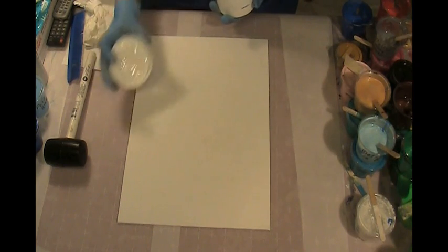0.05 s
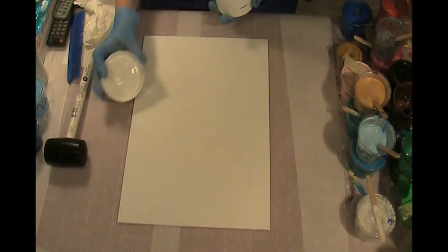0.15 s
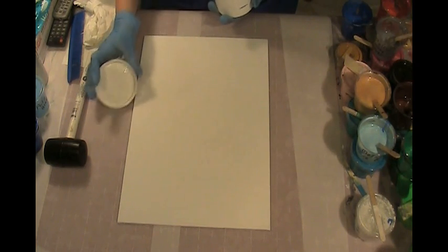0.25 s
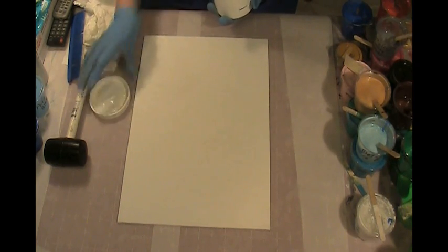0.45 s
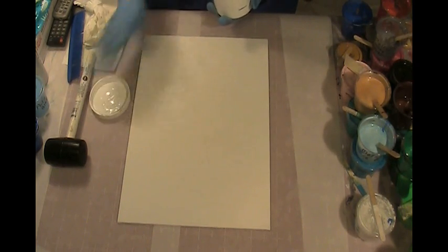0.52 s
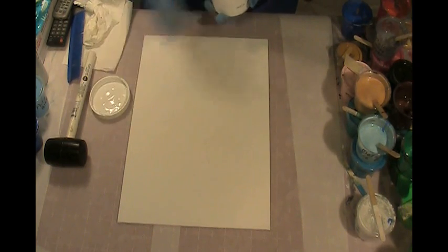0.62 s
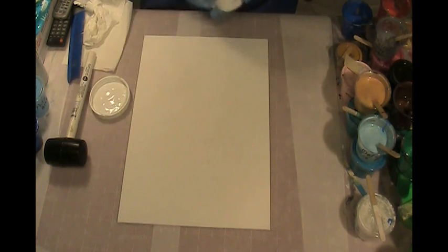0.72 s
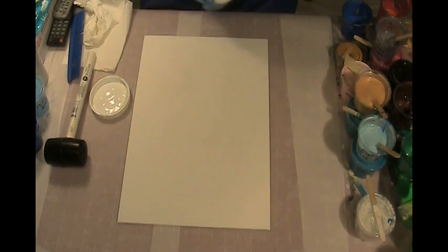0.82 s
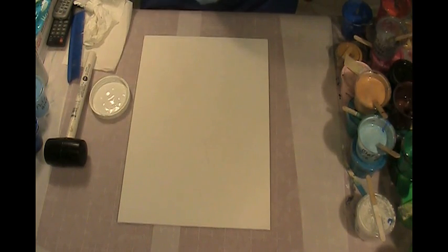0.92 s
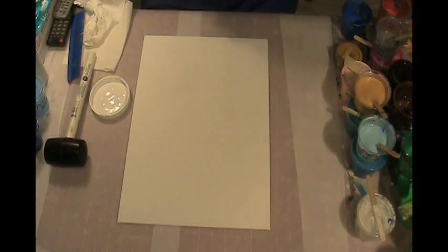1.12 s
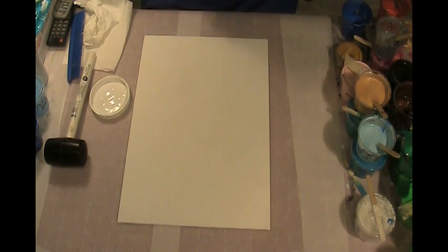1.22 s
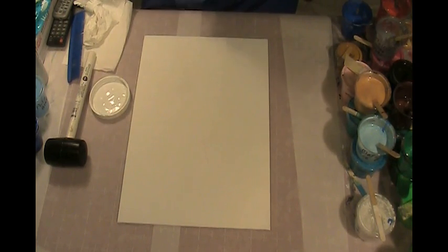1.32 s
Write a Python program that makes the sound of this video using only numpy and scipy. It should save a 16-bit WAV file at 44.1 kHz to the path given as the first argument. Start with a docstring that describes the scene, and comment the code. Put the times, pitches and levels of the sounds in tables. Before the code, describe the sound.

A plastic lid is set down on a table with a knock and a sharp clack.

```python
"""A plastic lid is set down on a covered table in a small room by a gloved hand.
One edge knocks first and slides on the cloth, then the lid drops flat with a sharp clack.
Each landing rings the lid and the table, and the rim chatters in a few quick clicks.
The glove rustles as the hand draws back; faint plastic taps and quiet room noise lie underneath."""
import sys
import numpy as np
from scipy import signal
from scipy.fft import rfft, irfft
from scipy.io import wavfile
from scipy.ndimage import uniform_filter1d

SR = 44100
rng = np.random.default_rng(int(sys.argv[2]) if len(sys.argv) > 2 else 0)


def store_wav(level_fs):
    """Save 16-bit WAV to argv[1]."""
    pcm = np.round(np.clip(np.atleast_2d(level_fs), -1, 1) * 32767)
    wavfile.write(sys.argv[1], SR, pcm.T.astype(np.int16))


N = 59535
TIME = np.arange(N) / SR

# the lid lands on its edge, then flat: start_s, level_db, splash_db, splash_brightness_hz
LANDINGS = [(0.218, -3, 4.5, 1920), (0.38967, -1.5, 7.5, 3700)]


def from_db(db):
    """Decibels to gain."""
    return 10 ** (np.asarray(db) / 20)


def unit_rms(x):
    """Scale to an rms of 1."""
    return x / np.sqrt(np.mean(x ** 2) + 1e-20)


def at_hz(curve, hz):
    """Read a curve on a log-frequency axis."""
    freqs, values = np.transpose(curve)
    return np.interp(np.log(hz), np.log(freqs), values)


def decay(start_s, t60_s):
    """Envelope that jumps to 1 and loses 60 dB in t60_s."""
    return (TIME >= start_s) * np.exp(-np.log(1000) * np.maximum(TIME - start_s, 0) / t60_s)


def ring(start_s, hz, t60_s):
    """A struck mode: a decaying sine."""
    return decay(start_s, t60_s) * np.sin(2 * np.pi * hz * (TIME - start_s))


def butter(x, hz, kind, order=2):
    """Causal Butterworth filter."""
    sos = signal.butter(order, np.clip(hz, 10, .45 * SR), kind, fs=SR, output="sos")
    return signal.sosfilt(sos, x + 1e-18)


def widen(mid, side, side_db):
    """Left and right from mid and side."""
    return mid + from_db(side_db) * side * np.array([[1], [-1]])


def stereo_noise(colour, width):
    """Steady noise of rms 1, shaped by a colour curve and a width curve."""
    hz = np.maximum(np.arange(N // 2 + 1) * SR / N, 1)
    mid, side = rfft(rng.standard_normal((2, N)))
    spectrum = widen(mid, side, at_hz(width, hz)) * from_db(at_hz(colour, hz))
    return unit_rms(irfft(spectrum, N))


def room_noise():
    """A steady wide hiss with the drone of a low resonance."""
    # tone of the hiss: freq_hz, relative_db
    colour = [(15, -45), (25, -25), (175, -8.5), (256, -3.5), (335, -3), (439, -3.5), (641, -8), (911, -7),
              (988, -16), (1070, -10), (1740, -19), (2110, -19), (7310, -29.5), (13600, -38.5),
              (16000, -42)]
    # stereo width of the hiss: freq_hz, side_over_mid_db
    width = [(30, -4), (100, 10.5), (250, -0.5), (700, -2), (2000, 2.5), (12000, 1.5)]
    resonance = ring(0, hz=245, t60_s=0.085)
    drone = signal.fftconvolve(rng.standard_normal(2 * N), resonance)[N:2 * N]
    return from_db(-52.5) * stereo_noise(colour, width) + from_db(-63.5) * unit_rms(drone)


def plastic_taps():
    """Light touches on the plastic, each a brief, blurred ring of narrow-band noise."""
    # faint taps: start_s, level_db, pitch_hz
    touches = [(0.082, -59, 2040), (0.777, -57.5, 2060), (1.116, -67, 3060), (1.2, -64, 3050),
               (1.264, -62, 1900), (1.311, -62, 2130)]
    band_ratio = 1.06
    out = np.zeros(N)
    for start_s, level_db, pitch_hz in touches:
        band = butter(rng.standard_normal(N), [pitch_hz / band_ratio, pitch_hz * band_ratio], "band")
        out += from_db(level_db) * decay(start_s, t60_s=0.14) * unit_rms(band)
    return out


def edge_slide():
    """The edge of the tilted lid hisses over the cloth between the two landings."""
    # swell and fade of the slide: time_s, level_db
    swell = [(.215, -53), (.228, -45.5), (.27, -44.5), (.32, -50), (.375, -52.5), (.395, -55)]
    # tone of plastic on cloth: freq_hz, relative_db
    colour = [(500, 4), (1000, 14), (2000, 2), (4500, -5), (6500, -5), (8200, -6), (10000, -17.5),
              (15000, -25)]
    level_db = np.interp(TIME, *np.transpose(swell), left=-120, right=-120)
    return from_db(level_db) * stereo_noise(colour, width=[(1000, -11.5)])


def lid_knocks():
    """Each landing rings the lid and the table; where it strikes sets the strength of each mode."""
    # modes of the lid: pitch_hz, t60_s, edge_hit_db, flat_hit_db
    lid_modes = [(642.5, 0.068, -24, -14), (831.6, 0.036, -20.5, -15), (1055.5, .028, -24, -12),
                 (1210, 0.032, -28, -21.5), (1412, 0.04, -23.5, -35), (1514, 0.025, -16.5, -29),
                 (1830, 0.043, -33, -13), (2044, 0.015, -26.5, -28), (2220, 0.013, -39, -13),
                 (2830, 0.035, -44, -31), (3237, 0.03, -46, -18.5), (3478, 0.019, -55, -14.5),
                 (4230, 0.0097, -28.5, -15.5), (6080, 0.013, -49, -27)]
    # modes of the table under it: pitch_hz, t60_s, edge_hit_db, flat_hit_db
    table_modes = [(91, 0.19, -53, -47), (141.8, 0.22, -39.5, -38), (226.7, 0.45, -54, -44.5),
                   (413.5, 0.25, -35, -33.5), (622, 0.073, -33.5, -29), (673.5, .16, -30, -28),
                   (881, 0.27, -32.5, -36.5)]
    out = np.zeros(N)
    for landing, (start_s, level_db, *_) in enumerate(LANDINGS):
        for pitch_hz, t60_s, *hit_db in lid_modes + table_modes:
            delay_s = 0.002031 * min(1000 / pitch_hz, 2)   # bending waves are slow in the bass
            out += from_db(level_db + hit_db[landing]) * ring(start_s + delay_s, pitch_hz, t60_s)
    return butter(out, 134, "high")   # a small lid radiates little bass


def landing_splash():
    """The broad pulse that each landing throws sideways, heard only by way of the walls."""
    out = np.zeros(N)
    for start_s, _, splash_db, brightness_hz in LANDINGS:
        pulse = butter(decay(start_s, t60_s=0.00098), brightness_hz, "low")
        out += from_db(splash_db) * unit_rms(pulse)
    return butter(out / np.sqrt(N), 408, "high")


def rim_chatter():
    """Each contact of the rim is a crack, a heavily damped snap, a scrunch and a trace of grit."""
    # the rim hits the table: start_s, level_db, brightness_hz
    contacts = [(0.2187, -3.5, 1570), (0.2221, -8, 1500), (0.2239, -13.5, 1030), (0.387, -8.5, 4300),
                (0.3893, -6.5, 4200), (0.39, 6, 4700), (0.39129, -2.5, 3120), (0.3945, -7.5, 5600),
                (0.3976, -4, 1990)]
    out = np.zeros(N)
    for start_s, level_db, brightness_hz in contacts:
        crack = from_db(-3) * unit_rms(ring(start_s, brightness_hz, t60_s=0.00055))
        snap = unit_rms(ring(start_s, hz=2157, t60_s=0.0047))
        scrunch_envelope = from_db(-3) * unit_rms(decay(start_s, t60_s=0.0034))
        grit_envelope = from_db(-7.5) * unit_rms(decay(start_s, t60_s=0.048))
        rasp = butter((scrunch_envelope + grit_envelope) * rng.standard_normal(N), 3520, "high")
        rasp = butter(rasp, 3 * brightness_hz, "low")
        out += from_db(level_db) * butter(snap + crack + rasp, brightness_hz, "low", order=1)
    return butter(out / np.sqrt(N), 670, "high")


def even_noise(envelope):
    """Two mid/side noise pairs, flattened so that no narrow band stands out under the envelope."""
    noise = rng.standard_normal((2, 2, N))
    for _ in range(2):
        power = uniform_filter1d(np.abs(rfft(noise * envelope)) ** 2, size=45, axis=-1)
        noise = unit_rms(irfft(rfft(noise) / np.sqrt(power), N))
    return noise


def room_reverb(sound):
    """Diffuse reflections build up quickly and die band by band, wider in the treble."""
    # tone of the reflections: freq_hz, level_db
    colour = [(100, -2.5), (300, -3.5), (700, -4), (1100, -6), (2000, -4), (3500, -5), (7000, -5),
              (14000, -8)]
    # decay of the room: freq_hz, t60_s
    decay_times = [(100, 0.28), (700, 0.24), (1400, 0.27), (2500, 0.22), (5000, 0.22), (14000, 0.16)]
    # stereo width of the reflections: freq_hz, side_over_mid_db
    width = [(100, -27), (700, -15.5), (1800, -8), (3500, -5), (7000, -3), (12000, 3)]
    predelay_s, build_s = 0.0023, 0.009
    build = np.clip((TIME - predelay_s) / build_s, 0, 1)
    noise = even_noise(build * decay(0, t60_s=0.3))
    edges_hz = np.geomspace(60, 17000, 17)
    response = np.zeros((2, N))
    for k, band in enumerate(zip(edges_hz, edges_hz[1:])):
        hz = np.sqrt(band[0] * band[1])
        tail = unit_rms(build * decay(0, at_hz(decay_times, hz))) / np.sqrt(N)
        mid, side = butter(noise[k % 2], band, "band")
        response += from_db(at_hz(colour, hz)) * tail * widen(mid, side, at_hz(width, hz))
    return signal.fftconvolve(response, sound[None], axes=1)[:, :N]


def glove_rustle():
    """Grainy friction of glove and sleeve that follows the hand as it draws back."""
    # the rustle rises and falls with the hand: time_s, level_db
    gesture = [(0, -89), (.55, -62.5), (.69, -80), (.74, -56.5), (.765, -61.5), (.783, -57.5), (.81, -61.5),
               (.86, -63.5), (.915, -61), (.96, -62.5), (1.02, -72), (1.1, -70.5), (1.118, -56),
               (1.15, -70), (1.205, -60.5), (1.228, -70), (1.27, -63.5), (1.35, -64)]
    # tone of the rustle: freq_hz, relative_db
    colour = [(300, -16), (1000, -1), (2000, 1.5), (3200, 2.5), (5000, -3.5), (7000, -3), (10000, -15),
              (15000, -22)]
    grain_db = 1.5 * unit_rms(butter(rng.standard_normal(N), 250, "low"))
    level_db = np.interp(TIME, *np.transpose(gesture)) + grain_db
    return from_db(level_db) * stereo_noise(colour, width=[(1000, -8.5)])


def scene():
    """The lid near the centre, its reverb, and the quiet sounds around it."""
    body, clicks = lid_knocks(), rim_chatter()
    hits = body + clicks
    # the top treble, 0.3 ms late, differs between left and right
    late_treble = np.interp(TIME - 0.0003, TIME, butter(hits, 9900, "high"))
    direct = widen(hits, late_treble, side_db=2)
    # the lid's higher modes are softened in the reverb, so its tail rings less
    send = butter(body, 3000, "low", order=1) + clicks
    reverb = room_reverb(from_db(-1) * send + landing_splash())
    return direct + reverb + edge_slide() + glove_rustle() + plastic_taps() + room_noise()


def record(dry):
    """Peaks clip at full scale and a steep low-pass cuts the top."""
    cutoff_hz = 15700
    lowpass = signal.ellip(10, .1, 80, cutoff_hz, fs=SR, output="sos")
    return signal.sosfilt(lowpass, np.clip(dry, -1, 1))


dry = scene()
out = record(dry)
store_wav(out)
```